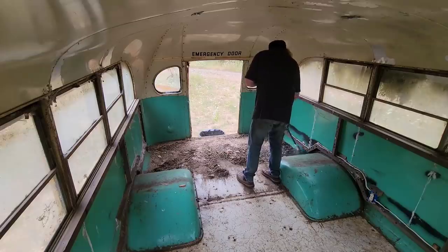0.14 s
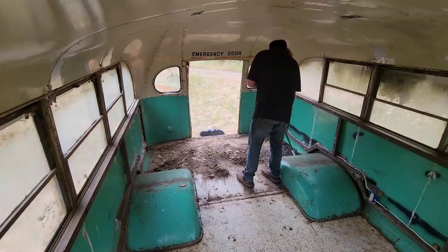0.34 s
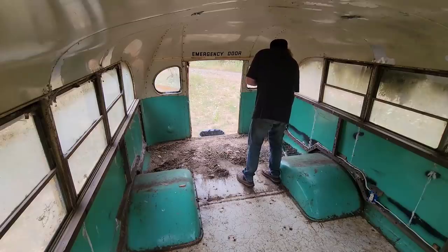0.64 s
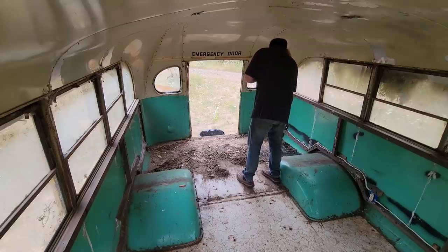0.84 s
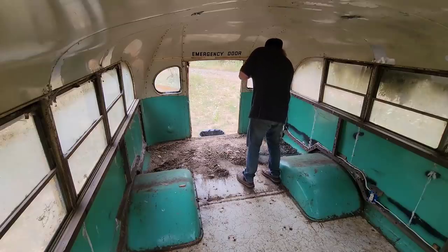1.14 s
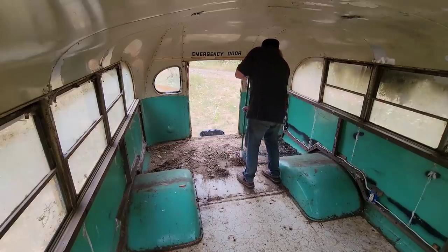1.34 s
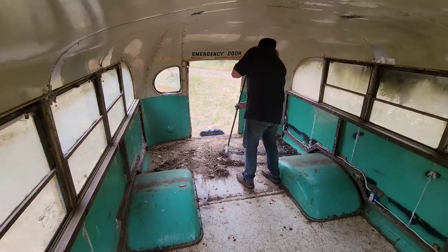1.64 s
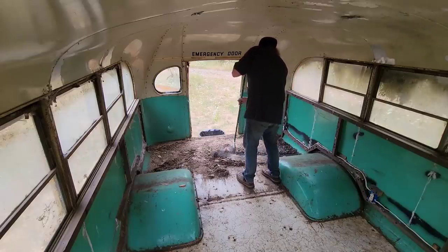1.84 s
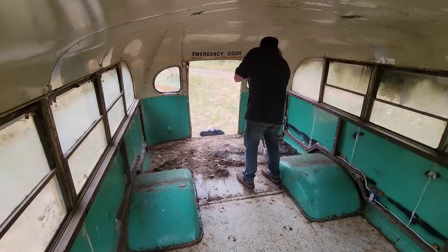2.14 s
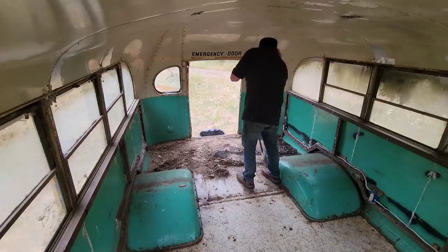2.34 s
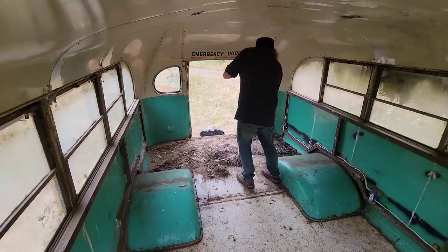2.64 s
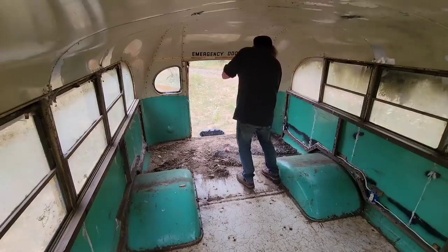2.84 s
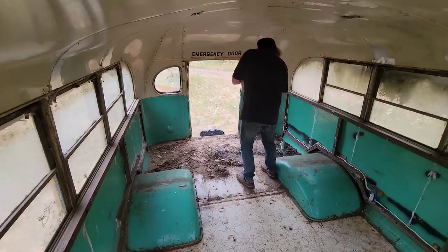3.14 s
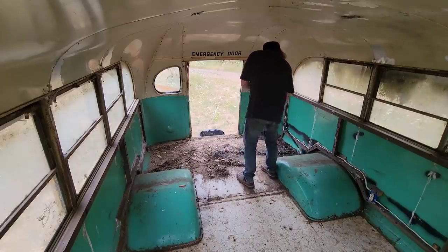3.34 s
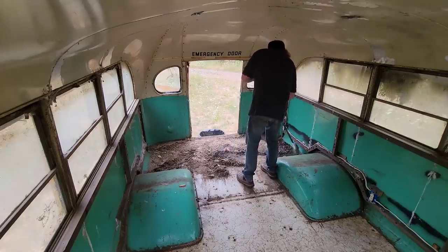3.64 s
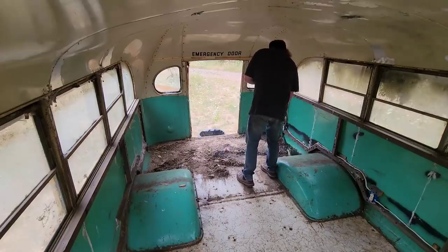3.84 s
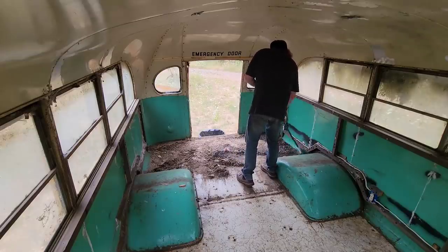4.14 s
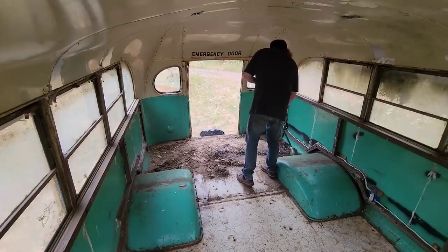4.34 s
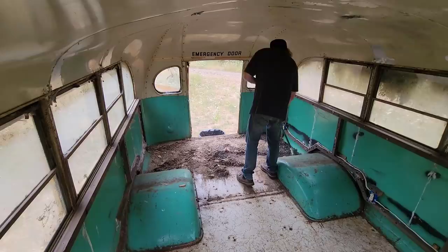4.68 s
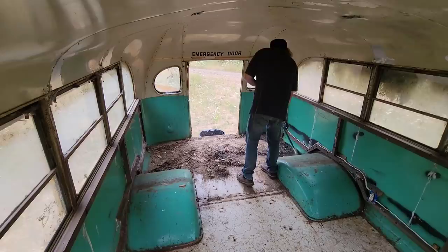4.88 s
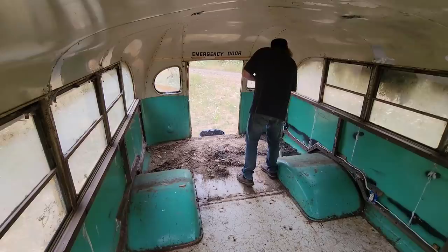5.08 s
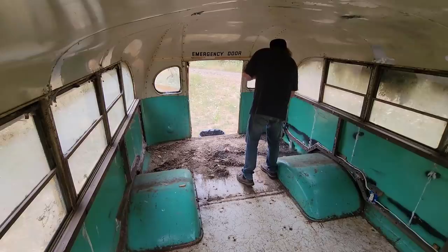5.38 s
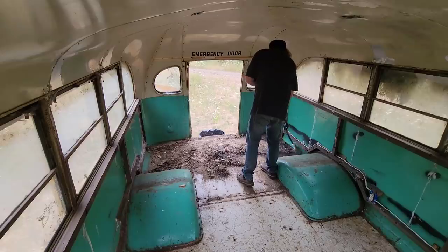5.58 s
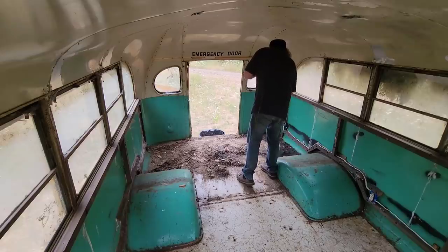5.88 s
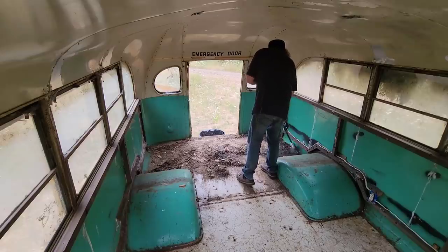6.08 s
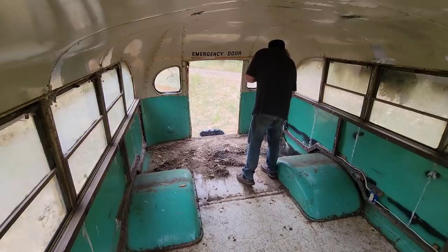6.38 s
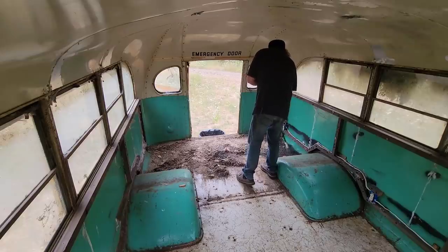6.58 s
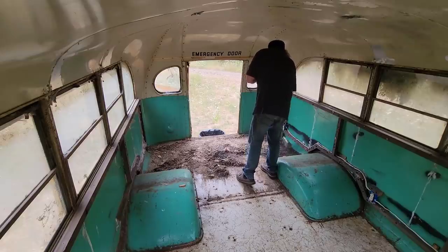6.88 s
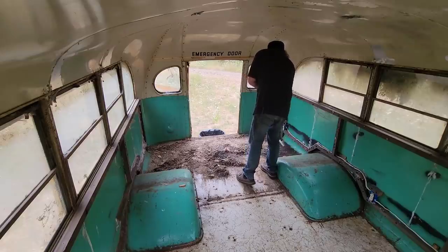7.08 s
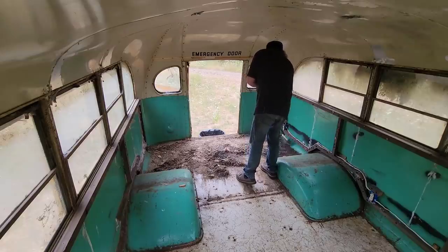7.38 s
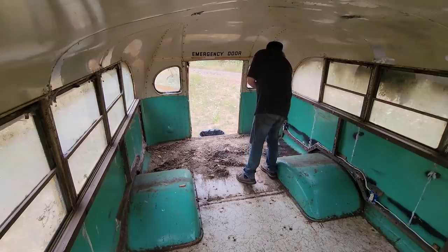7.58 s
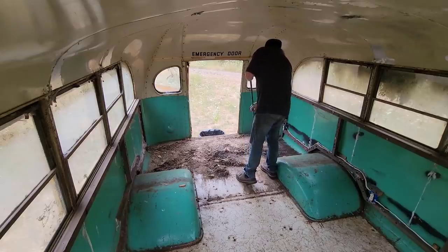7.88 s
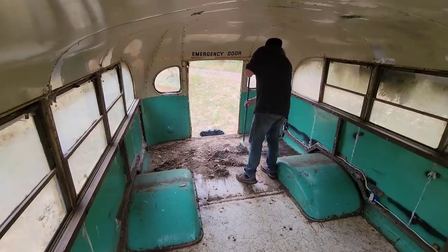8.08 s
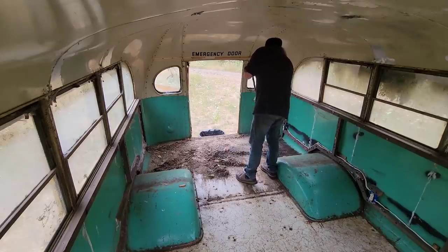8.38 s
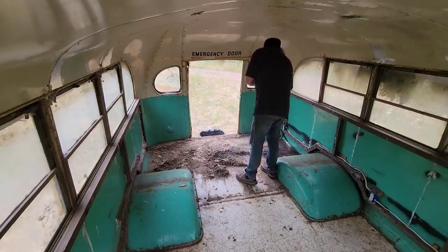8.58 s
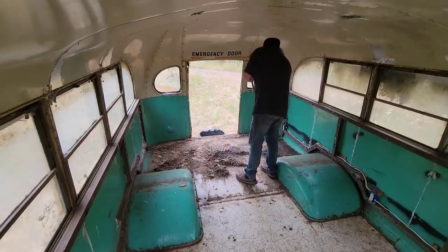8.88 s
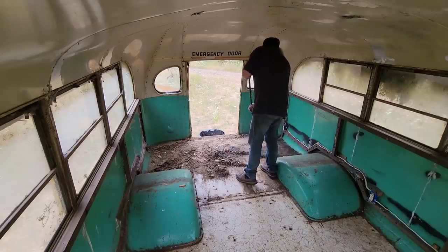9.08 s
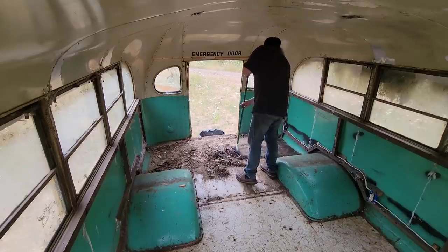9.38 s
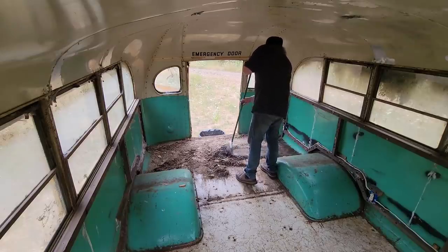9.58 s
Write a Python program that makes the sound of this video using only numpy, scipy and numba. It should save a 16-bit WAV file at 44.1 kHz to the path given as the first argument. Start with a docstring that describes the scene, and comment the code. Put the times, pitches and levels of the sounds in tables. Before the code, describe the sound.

A stiff broom works through dry debris a few metres from the microphones in a bare bus cabin. It begins with two long, gritty sweeps, followed by dull shifting footsteps and small clicks. Short, brisk strokes come next, most starting with a knock on the ringing metal floor. Last come two long scraping pulls, the first with a brief floor panel hum. The space sounds small and hollow, over a faint rumble.

```python
"""Inside an empty bus shell: a stiff broom on dry litter, a few metres from a spaced pair of microphones.
It opens with two long sweeps, bristle tips hissing and grit scraping over the ringing sheet-metal floor.
Near 3 s feet thump and loose bits click. Short strokes follow: the head knocks, the sheet rings, the
shell booms. From 7.4 s come two long, rasping pulls, the first with a floor panel humming under it.
Throughout, the bare cabin scatters the sound between the microphones."""
import sys
import numpy as np
from scipy import signal
from scipy.fft import rfft, irfft
from scipy.io import wavfile
from scipy.ndimage import uniform_filter1d
from numba import njit

SR = 44100
rng = np.random.default_rng(int(sys.argv[2]) if len(sys.argv) > 2 else 0)


def to_wav(sig):
    """Store sig (one row per channel, or 1-D mono) as 16-bit WAV at the path in sys.argv[1].

    Samples outside -1..1 are clipped; the rate is SR.
    """
    pcm = np.clip(np.atleast_2d(sig), -1, 1) * 32767
    pcm = np.round(pcm).astype(np.int16)
    wavfile.write(sys.argv[1], SR, pcm.T)  # frames by channels


N = 428652
TIME, HZ = np.arange(N) / SR, np.fft.rfftfreq(N, 1 / SR)
CONTROL_TIME = TIME[::32]  # coarse grid for level curves

# room tone of the cabin: (frequency [Hz], density [dB])
ROOM_TONE = [(30, -6.5), (85, -0.5), (150, -9), (350, -15.5), (600, -17), (1500, -28), (4000, -25),
             (7000, -28), (15500, -41)]
# likeness of the two spaced microphones: (frequency [Hz], correlation [-1..1])
MIC_CORRELATION = [(60, 0.93), (130, 0.98), (290, 0.69), (640, -0.49), (1410, -0.48), (3100, -0.047),
                   (6820, 0.034), (15000, -0.08)]
# colour of the microphone ports: (frequency [Hz], left over right [dB])
MIC_BALANCE = [(60, 0.5), (110, 0.5), (200, 0.77), (380, 0.25), (700, 0.32), (1290, -1.9), (2380, 0.51),
               (4400, -1.3), (8120, 1.0), (15000, -1.2)]
# deep, middle and upper boom of the shell, a list each: (frequency [Hz], width [Hz], gain [dB])
SHELL_MODES = [
    [(35.2, 15, -15), (54.7, 15, -7)],
    [(88.6, 6.1, 18), (103, 4.7, -19)],
    [(153.5, 3.6, -2.5), (180.4, 58, -7.5)],
]
# shifting feet: (crest [s], rise [s], fall [s], lower ring [dB], three booms [dB])
FOOT_SHIFTS = [(0.09, .05, 0.23, -58, -58, -46, -70), (0.46, 0.09, 0.058, -60, -42, -51, -49),
               (1.298, 0.65, 0.68, -60, -71, -48, -49.5), (2.979, 0.024, 0.13, -60, -49, -41, -47),
               (3.07, 0.1, 0.11, -45.5, -42, -29.5, -54), (3.2, 0.045, 0.38, -58, -51.5, -52, -76),
               (3.54, 0.13, 0.055, -60, -47, -52, -71), (5.81, 0.42, 0.29, -65, -64, -51, -52),
               (9.42, 0.47, 0.29, -46.5, -74, -57, -51.5)]
# heel or broom head on the floor: (time [s], level [dB], pitch [Hz], t60 [s])
THUMPS = [(0.301, -28, 143, 0.36), (2.965, -28, 149, 0.14), (3.01, -25.5, 92, 0.1), (3.06, -38, 68, 0.19),
          (3.088, -20, 85, 0.055), (3.189, -31, 87, 0.38), (3.361, -23, 58, 0.25), (3.809, -40, 56.5, 0.18),
          (4.189, -32, 62.4, 0.37), (5.538, -25, 140.8, 0.49), (5.601, -15, 91.5, 0.096),
          (7.023, -35.5, 153, 0.5), (7.443, -29, 153, 0.26)]
# humming floor panel: (time [s], pitch [Hz], level [dB])
PANEL_HUM = [(7.64, 146.7, -68), (7.68, 148, -43), (7.79, 151, -46), (7.83, 154, -40), (7.88, 153, -46),
             (7.99, 154, -51), (8.03, 152, -75)]
# loose bits of litter: (time [s], level [dB], pitch [Hz], t60 [s], crack over rattle [dB])
LITTER_BITS = [(2.7674, -38.5, 2320, 0.068, -11), (2.9348, -50.5, 4100, 0.14, -12),
               (3.057, -50, 2920, 0.22, -14), (3.114, -48, 8000, 0.033, -6), (3.2544, -50, 9000, 0.025, -6),
               (3.681, -44, 3180, 0.049, -11), (6.472, -40.5, 2600, 0.045, -16),
               (6.8492, -41.5, 4060, 0.091, -12), (8.2463, -29.5, 3770, 0.019, -10),
               (8.254, -36, 4000, 0.031, -12), (8.288, -32.5, 3880, 0.023, -12),
               (8.4514, -42.5, 2360, 0.11, -13), (8.495, -53, 8300, .02, -12),
               (8.581, -44, 4500, 0.022, -12)]

# floor sheet under the bristles, and its upper modes under grit: (frequency [Hz], width [Hz], gain [dB])
SHEET_MODES = [(269, 3.9, 2), (346, 35, 3.5), (410, 38, -4), (526, 120, -4.5), (602, 51, -9), (704, 100, 1),
               (776, 40, -4), (960, 60, -9), (1325, 47, -3.5), (1470, 85, -5)]
GRIT_MODES = [(1185, 35, -4.5), (1487, 74, -1), (1737, 60, 1), (1880, 45, -2), (2553, 76, -2.5),
              (2697, 65, -1), (3014, 60, -4.5)]
# the note of the patch of floor under each stroke: (start [s], pitch [Hz], strength [dB])
FLOOR_PATCHES = [(0, 730, -16), (.25, 898, -5), (.55, 380, -18), (.76, 264, -4), (.89, 335, 2),
                 (.99, 413, 0.5), (1.12, 300, -22), (2.2, 318, -4.5), (3.3, 630, -11), (3.772, 517, -4),
                 (4.119, 800, 0), (4.49, 467, -2), (4.85, 300, 4.5), (5.5, 347, -9), (6.11, 380, 2),
                 (6.52, 460, -25), (7.0, 804, -10), (7.42, 360, -7), (7.52, 204, 5), (7.88, 415, -14),
                 (8.62, 292, -6.5)]
# spectra of the sheet's lower and upper ring, the grit and the tips: (frequency [Hz], density [dB])
LOWER_RING_SPECTRUM = [(150, -8), (240, 4), (400, 1.5), (600, -3.5)]
UPPER_RING_SPECTRUM = [(330, -32), (500, 1.5), (900, 8), (1300, 2.5), (2500, -7)]
GRIT_SPECTRUM = [(600, -18), (1200, 2.5), (2000, 0), (3000, -1.5), (4200, -9.5), (7000, -18.5)]
HISS_SPECTRUM = [(2500, -3), (4500, -2.5), (5700, -4.5), (7000, -4.5), (10000, -6), (12500, -4.5),
                 (15500, -8)]
# rasp of the long pulls, climbing with speed: (time [s], pitch [Hz], level over grit [dB])
GRIT_RASP = [(0, 1480, -7.5), (7.45, 1200, -18), (7.55, 1230, 3), (7.7, 2140, 2), (7.8, 2700, -6.5),
             (7.92, 2715, 4.5), (8.1, 2500, -35), (8.65, 1970, -18), (8.84, 2130, -13), (8.95, 2250, 5),
             (9.1, 2700, 4.5), (9.3, 2400, -24)]
# the top of the hiss against the rest: (time [s], gain [dB])
HISS_TREBLE = [(0, 3.2), (.3, 4.1), (.6, 0.2), (1.1, 0), (1.6, 0.1), (2.1, -3), (2.5, -1), (2.8, -6),
               (3.0, 5), (3.2, -4), (3.35, 3.2), (3.55, -2), (3.8, 4), (4.0, -2), (4.15, 2.3), (4.4, -2.5),
               (4.55, 3.5), (4.8, 0.1), (5.0, 1), (5.25, -0.5), (5.48, 5), (5.55, 1), (5.63, 3),
               (5.72, -3.5), (5.95, -1), (6.14, 2.5), (6.45, 2), (6.7, 0), (7.03, 2.3), (7.3, -4), (7.5, 1),
               (7.75, -0.5), (8.0, 1), (8.3, -3.5), (8.55, -1), (8.8, -2.2), (9.2, -0.3), (9.72, -2)]
# modes of the sheet when struck: (frequency [Hz], t60 [s], swell [s])
KNOCK_MODES = [(338.2, 0.09, 0.0087), (431.4, 0.091, 0.0055), (490, 0.13, 0.0035), (537, 0.08, 0.0027),
               (599, 0.17, 0.0016), (646, .15, .001), (706, 0.2, 0.0016), (767, 0.24, 0.00079),
               (870, 0.11, 0.0022), (955, 0.081, .002)]
# knocks of the head: (time [s], judder decay [s], first blow over judder [dB], level of each mode [dB])
HEAD_KNOCKS = [(0.277, 0.023, -6, -32, -30.5, -33, -34, -29, -37, -33, -38, -25, -32),
               (3.34, 0.024, -6.5, -28, -37, -42, -45, -25, -20.5, -28, -29, -18, -23),
               (3.362, .02, 1.5, -31, -40, -42, -38, -27, -22, -25, -34, -32, -29),
               (3.788, 0.017, 0, -40, -36, -24, -30, -38, -46, -37, -33, -37, -27),
               (4.148, 0.012, 8, -36, -30, -27, -33, -14.5, -35, -22, -15, -40, -24),
               (4.167, .03, 0.5, -25, -34, -32, -39, -29, -34, -22, -14.5, -42, -28),
               (4.242, 0.014, -5, -47, -45, -47, -51, -42, -37, -34, -30, -45, -45),
               (4.521, 0.043, -4, -43, -30, -31, -21.5, -31, -36, -49, -29.5, -25, -29),
               (4.869, 0.037, -6, -38, -42, -31, -36, -37, -33, -32, -32, -32, -46),
               (5.527, 0.03, -5, -21.5, -35, -24.5, -24, -24, -41, -32, -43, -47, -40),
               (6.131, 0.031, -8, -31, -32.5, -54, -52, -38, -47, -44, -42, -37, -29.5),
               (6.542, 0.0099, 1, -43, -51, -60, -56, -50, -44, -41, -46, -35, -40),
               (7.024, 0.042, -9, -38, -37, -44, -33, -30, -29, -36, -27, -34, -39.5),
               (7.445, 0.032, 1, -29, -38, -38, -36, -22.5, -36, -23, -33, -33, -39),
               (8.639, 0.032, -6, -61, -43, -51, -55, -50, -49, -49, -55, -45, -42)]

# A touch feeds seven layers: hiss, grit, upper ring, lower ring, deep, middle and upper boom.
# the broom lands: (time [s], rise of the tips [s], head behind tips [s], seven layer levels [dB])
LANDINGS = [(0.0, 0.06, 0.00083, -43.5, -37.5, -33, -38, -38, -53, -45),
            (0.268, 0.027, 0.012, -34, -31.5, -25, -35, -32.5, -40, -32),
            (2.23, 0.03, 0.0081, -45.5, -46, -63, -68, -65, -67, -70),
            (3.326, 0.026, 0.017, -31.5, -29.5, -24, -41, -32, -33.5, -37.5),
            (3.783, 0.015, 0.011, -37, -33.5, -29, -42, -39.5, -43, -45.5),
            (4.135, 0.046, 0.013, -34, -31, -26, -38, -40, -39.5, -65),
            (4.511, 0.029, 0.016, -34, -33, -27, -39, -51, -77, -47),
            (4.852, 0.016, 0.02, -42.5, -38, -31, -42.5, -45, -47, -43),
            (5.473, 0.0065, .01, -51, -49, -46, -60, -70, -70, -67),
            (5.513, 0.042, 0.017, -34.5, -32, -27.5, -28, -30, -33, -27),
            (6.123, 0.0072, 0.015, -33, -31.5, -32.5, -41, -47, -47.5, -42.5),
            (6.534, 0.01, 0.015, -46.5, -42, -47, -43.5, -51, -63, -70),
            (7.013, 0.019, 0.015, -32.5, -30.5, -30, -38, -61, -68, -47),
            (7.432, 0.016, 0.017, -30.5, -31.5, -25, -35, -42.5, -50, -46),
            (8.637, .008, 0.0077, -65, -47, -48, -52, -63, -58, -71)]
# shape of a landing, by layer: (lag [s]), (hold [s]), (fall [dB/s]), and from the grit on (rise [s])
LAND_LAG_S = [-0.0015, -0.0088, -0.0082, -0.00051, 0.012, 0.0033, 0.015]
LAND_HOLD_S = [0.012, 0.014, 0.014, 0.0038, 0.02, 0.014, 0.0052]
LAND_FALL_DB_S = [380, 300, 264, 166, 91, 110, 172]
HEAD_RISE_S = [0.02, 0.021, 0.046, 0.065, 0.041, 0.047]
# short drags: (crest [s], rise [s], fall [s], hiss [dB], grit, upper and lower ring over hiss [dB])
DRAGS = [(0.04, .04, 0.24, -55.5, 0, 8, 6), (0.33, 0.054, 0.23, -45, 2, 6, 7.5),
         (3.423, 0.15, 0.25, -41, 3.5, 5.5, 3), (3.82, 0.036, 0.2, -43.5, 5.5, 7, 6),
         (4.22, 0.17, 0.25, -40.5, 3.5, 5, 1), (4.56, 0.086, 0.27, -41, 4, 6, 0.5),
         (4.98, 0.22, 0.37, -44.5, -0.5, 3, -3.5), (5.2, 0.39, 0.11, -49, -7.5, -1.5, -6.5),
         (5.6, 0.19, 0.19, -52.5, 1, 10, -2), (5.7, 0.073, 0.21, -37.5, -4, -4, -7.5),
         (5.739, 0.14, 0.28, -41.5, 3.5, -1.5, -8.5), (6.17, 0.033, 0.28, -42.5, 2.5, 1, -5),
         (6.56, 0.041, 0.63, -51, -1, -16, 3), (6.685, 0.19, 0.2, -42, 4.5, 1.5, -14),
         (7.124, 0.13, 0.19, -39.5, 6, 2.5, -5.5)]
# shape of a drag, by layer: (share of the hiss's fade [ratio]), (crest after the hiss [s])
DRAG_FADE = [0.95, 0.98, 1, 0.85, 0.46, 0.93, 0.63]
DRAG_LAG_S = [0, 0.0031, 0, 0.017, .016, .016, 0.0045]
# the shell under a drag: (deep, middle and upper boom over hiss [dB])
DRAG_BOOM_DB = [-18, -24, -18]
# the tips graze the litter on the way back: (crest [s], fall [s], hiss [dB])
GRAZES = [(0.232, 0.088, -61), (2.2, .04, -81), (3.13, 0.2, -59.5), (3.262, 0.034, -61),
          (3.69, 0.53, -59.5), (4.095, 0.045, -65), (4.805, 0.1, -66), (5.368, 0.32, -63), (6.0, 0.12, -52),
          (6.478, 0.028, -61), (6.94, 0.074, -73), (7.35, 0.84, -61)]
# long sweeps, a list each: (time [s], hiss [dB], grit over hiss [dB], upper ring over hiss [dB])
SWEEPS = [
    [(0.53, -63, 5, 3), (0.552, -50.5, 0, -7), (0.59, -42.5, -2.5, -3), (0.72, -44, -1.2, 4.5),
     (0.8, -44, -2.5, 4), (0.92, -43.5, -2.5, 5), (1.03, -44, -1, 3), (1.07, -39, 1, -1.5),
     (1.124, -38.5, -10, -4), (1.36, -44, -3.5, -4.5), (1.552, -45.5, -10, -8), (1.66, -60.5, -1, -1),
     (1.888, -55, -17, -20), (2.012, -68.5, -7, -1.5), (2.2, -92, 7, -10)],
    [(2.22, -75, 1.5, -13), (2.26, -48.5, 2, -2), (2.31, -52, 2, -3), (2.438, -43, -2, 0),
     (2.536, -43, -8.5, -4.5), (2.794, -56, 0, -4), (2.93, -69, -5, 4.5), (3.0, -82, 8, 15)],
    [(7.44, -56, 1.5, 3), (7.47, -40.5, -3, -3), (7.562, -42, 4.5, -4.5), (7.728, -35, 1.5, -8.5),
     (7.81, -40, -2.5, -5), (7.952, -36.5, -0.5, -8.5), (8.162, -55, -10, -7), (8.26, -47.5, -13, -13.5),
     (8.44, -70.5, -3, 5.5), (8.46, -67, 8.5, -2), (8.6, -84.5, 11, 11)],
    [(8.636, -56.5, 21.5, 9), (8.652, -51, -1, -2.5), (8.804, -37.5, 4, -4.5), (8.86, -43, 9.5, 0.5),
     (8.95, -41, -6.5, -0.5), (9.03, -43, 1.5, -1), (9.098, -40, -1.5, -2.5), (9.164, -44, -5.5, 1),
     (9.416, -46.5, -7, -13), (9.522, -58, -4.5, -5), (9.62, -54.5, -14, -16), (9.72, -53, -12, -14)],
]
# low end of each sweep: (lower over upper ring [dB], three booms over hiss [dB])
SWEEP_BODY = [(1.5, -26, -12, -11.5), (2.5, -25, -11, -13.5), (-1, -31, -19.5, -15), (-2, -31, -22.5, -21)]

GRAZE_RISE_S, GRAZE_COLOUR_DB = 0.076, [-2, -3.5, -7]  # grit, upper and lower ring over hiss
BITE_DB_PER_DECADE = 36.5  # the tips bite fast, then press on
SETTLE_DB, SETTLE_S = -36, 0.49  # litter trickles on after a drag: level against the hiss, fall time
CABIN_T60_S, CRACK_T60_S = 0.19, 0.0099
RASP_WIDTH_HZ, TREBLE_FROM_HZ = 2600, 6300
BASS_CUT_HZ, TOP_CUT_HZ = 16, 15550
ROOM_TONE_DB, SILENT_DB = -65, -200


def undb(db):
    """Decibels to amplitude."""
    return 10 ** (np.asarray(db) / 20)


def unit(x):
    """Scale to an RMS of 1."""
    return x / np.sqrt(np.mean(x ** 2))


def decay(t, t60):
    """A fade of 60 dB every t60 seconds."""
    return np.exp(-np.log(1000) * t / t60)


def along_hz(table):
    """A (frequency, value) table read at every frequency."""
    hz, value = np.transpose(table)
    return np.interp(np.log(HZ + 1), np.log(hz), value)


def along_time(table):
    """Each column of a (time, ...) table read at every sample."""
    times, *columns = np.transpose(table)
    return [np.interp(TIME, times, column) for column in columns]


def colour(x, table):
    """Shape the spectrum; beyond the table's ends it keeps falling."""
    skirts = np.minimum(1, HZ / table[0][0]) ** 2 * np.minimum(1, table[-1][0] / (HZ + 1)) ** 2
    return irfft(rfft(x) * undb(along_hz(table)) * skirts, N)


@njit
def bandpass(x, hz, width):
    """State-variable band-pass with a moving centre, gain 1 there."""
    out, band_state, low_state = np.empty(len(x)), 0., 0.
    for i in range(len(x)):
        g, damping = np.tan(np.pi * hz[i] / SR), width / hz[i]
        band = (band_state + g * (x[i] - low_state)) / (1 + g * (g + damping))
        band_state, low_state = 2 * band - band_state, low_state + 2 * g * band
        out[i] = damping * band
    return out


def bandpass_twice(x, hz, width):
    """Two band-passes in a row, for steeper skirts."""
    return bandpass(bandpass(x, hz, width), hz, width)


def ring(x, modes):
    """Sum of steady resonances driven by x."""
    return sum(undb(db) * bandpass(x, np.full(N, float(hz)), float(width)) for hz, width, db in modes)


def slips(rate_hz, spread_db):
    """Tiny stick-slip releases at random moments, a few much stronger than the rest."""
    hit = rng.random(N) < rate_hz / SR
    return hit * rng.standard_normal(N) * undb(spread_db * rng.exponential(size=N))


def flicker(rate_hz, depth_db):
    """Gain that wanders as the bristles cross uneven litter."""
    hold = int(SR / rate_hz)
    steps = np.repeat(rng.standard_normal(N // hold + 1), hold)[:N]
    return undb(depth_db * uniform_filter1d(uniform_filter1d(steps, hold), hold))


def swell_db(crest, rise, fall, fade=(1,), lag=(0,)):
    """Climb 30 dB over `rise` to 0 dB, then drop 30 dB times `fade` over `fall`; one row a layer."""
    t = CONTROL_TIME - crest - np.vstack(lag)
    from_crest = np.where(t < 0, -t / rise, t / fall)
    return -30 * from_crest ** 1.316 * np.where(t < 0, 1, np.vstack(fade))


def room_tone():
    """The faint, steady rumble and air of the empty cabin."""
    return undb(ROOM_TONE_DB) * unit(colour(rng.standard_normal(N), ROOM_TONE))


def cabin(x, hop):
    """Dense reflections off the bare walls; every `hop` samples the sound takes other paths."""
    tail = decay(TIME[:SR // 5], CABIN_T60_S)
    window = np.sqrt(np.hanning(2 * hop + 1)[:-1])
    x, out = np.pad(x, (hop, 2 * hop)), np.zeros(N + SR)
    for i in range(0, N + hop, hop):
        echoes = signal.fftconvolve(x[i:i + 2 * hop] * window, rng.standard_normal(len(tail)) * tail)
        out[i:i + len(echoes)] += echoes
    return out[hop:hop + N] / np.sqrt(np.sum(tail ** 2))


def shell_boom(booms_db):
    """The low modes of floor and walls all around the microphones, shaken and left to ring."""
    out = 0
    for db, modes in zip(booms_db, SHELL_MODES):
        push = rng.standard_normal(N)
        steady_rms = np.sqrt(np.mean(ring(push, modes) ** 2))
        out += ring(push * undb(db), modes) / steady_rms
    return out


def foot_shifts():
    """Layer levels in dB as shifting feet shake only the floor and shell."""
    for crest, rise, fall, *levels_db in FOOT_SHIFTS:
        yield np.vstack([SILENT_DB] * 3 + levels_db) + swell_db(crest, rise, fall)


def thumps():
    """A heel or the broom head meets the floor softly: one low note, swelling over milliseconds."""
    out, t = np.zeros(N + SR), TIME[:SR // 2]
    attack = 1 - np.exp(-t / 0.0037)
    for start, db, hz, t60 in THUMPS:
        i = int(start * SR)
        out[i:i + len(t)] += undb(db) * np.sin(2 * np.pi * hz * t) * attack * decay(t, t60)
    return out[:N]


def panel_hum():
    """A floor panel holds a wavering note under one long pull."""
    hz, db = along_time(PANEL_HUM)
    sounding = (TIME > PANEL_HUM[0][0]) & (TIME < PANEL_HUM[-1][0])
    tone = np.sqrt(2) * np.sin(2 * np.pi * np.cumsum(hz) / SR)
    return sounding * undb(db) * flicker(rate_hz=22, depth_db=1.2) * tone


def litter_clicks():
    """Single bits click or skitter: a short rattle around one pitch with a wide crack on top."""
    out, t = np.zeros(N), TIME[:SR // 4]
    attack = 1 - np.exp(-t / 0.0018)
    for start, db, hz, t60, crack_db in LITTER_BITS:
        noise = rng.standard_normal(len(t))
        rattle = unit(bandpass_twice(noise, np.full(len(t), hz), width=0.64 * hz))
        crack = undb(crack_db) * np.diff(noise, prepend=0) * decay(t, CRACK_T60_S)
        i = int(start * SR)
        out[i:i + len(t)] += undb(db) * (rattle + crack) * attack * decay(t, t60)
    return out


def floor_ring(grit_db, upper_db, lower_db):
    """Slips drive the sheet's modes and the note of the patch under the broom; grit rings higher modes."""
    push = unit(slips(rate_hz=6000, spread_db=0.69))
    starts, patch_hz, patch_db = np.transpose(FLOOR_PATCHES)
    patch = np.searchsorted(starts, TIME, side="right").clip(1) - 1
    patch_note = undb(9.5 + patch_db[patch]) * bandpass(push, patch_hz[patch], width=31.0)
    sheet = push + undb(2) * ring(push, SHEET_MODES) + patch_note
    upper = undb(upper_db) * unit(colour(sheet, UPPER_RING_SPECTRUM))
    lower = undb(lower_db) * unit(colour(sheet, LOWER_RING_SPECTRUM))
    return upper + lower + undb(grit_db - 7.5) * unit(ring(push, GRIT_MODES))


def head_knocks(phase):
    """The head strikes, judders for a moment, and each mode of the sheet swells and rings out."""
    out, t = np.zeros(N + SR), TIME[:SR // 2]
    for start, judder_s, blow_db, *modes_db in HEAD_KNOCKS:
        i, judder = int(start * SR), np.exp(-t / judder_s)
        for (hz, t60, swell_s), db in zip(KNOCK_MODES, modes_db):
            attack = (1 - np.exp(-t / swell_s)) ** 2
            mode = np.sin(2 * np.pi * hz * t + phase) * attack * decay(t, t60)
            push = judder * rng.standard_normal(len(t))
            push[0] = undb(blow_db) * np.sqrt(np.sum(judder ** 2))  # the first blow
            rung = signal.fftconvolve(push, mode)[:len(t)]
            out[i:i + len(t)] += undb(db) * rung / np.abs(rung).max()
    return out[:N]


def grit_scrape():
    """Grit sticks and slips on the metal, rasping around a climbing pitch on the long pulls."""
    grit = unit(colour(slips(rate_hz=8000, spread_db=1.25), GRIT_SPECTRUM))
    grit *= flicker(rate_hz=25, depth_db=0.24)
    rasp_hz, rasp_db = along_time(GRIT_RASP)
    rasp = bandpass_twice(slips(rate_hz=14000, spread_db=0.8), rasp_hz, RASP_WIDTH_HZ)
    return grit + undb(rasp_db) * unit(rasp)


def bristle_hiss():
    """The slips of many tips merge into a hiss whose treble rises and falls."""
    hiss = unit(colour(slips(rate_hz=22000, spread_db=0.39), HISS_SPECTRUM))
    hiss *= flicker(rate_hz=33, depth_db=0.4)
    treble = irfft(rfft(hiss) / (1 + (TREBLE_FROM_HZ / (HZ + 1)) ** 8), N)
    treble_gain = undb(along_time(HISS_TREBLE)[0])
    return hiss + (treble_gain - 1) * treble


def broom_landings():
    """Layer levels in dB as the tips land, then the head; heavier parts swell later and last longer."""
    for time, tip_rise, head_delay, *levels_db in LANDINGS:
        t = CONTROL_TIME - time - np.vstack(LAND_LAG_S) - np.vstack([0] + [head_delay] * 6)
        rise = np.vstack([tip_rise, *HEAD_RISE_S])
        bite_db = BITE_DB_PER_DECADE * np.log10(np.maximum(1 + t / rise, 1e-6))
        release_db = -np.vstack(LAND_FALL_DB_S) * (t - np.vstack(LAND_HOLD_S))
        yield np.vstack(levels_db) + np.minimum(0, np.minimum(bite_db, release_db))


def broom_drags():
    """Layer levels in dB for short drags, grazes on the way back, and litter settling after a drag."""
    grazes = [(crest, GRAZE_RISE_S, fall, db, *GRAZE_COLOUR_DB) for crest, fall, db in GRAZES]
    for crest, rise, fall, hiss_db, *colour_db in DRAGS + grazes:
        levels_db = hiss_db + np.vstack([0, *colour_db, *DRAG_BOOM_DB])
        yield levels_db + swell_db(crest, rise, fall, DRAG_FADE, DRAG_LAG_S)
    for crest, rise, _, hiss_db, *_ in DRAGS:
        yield np.vstack([hiss_db + SETTLE_DB] + [SILENT_DB] * 6) + swell_db(crest, rise, SETTLE_S)


def broom_sweeps():
    """Layer levels in dB while the broom stays down; grit, floor and shell follow the hiss."""
    for sweep, (lower_db, *booms_db) in zip(SWEEPS, SWEEP_BODY):
        times, *columns = np.transpose(sweep)
        hiss, grit, upper = (np.interp(CONTROL_TIME, times, column) for column in columns)
        hiss[(CONTROL_TIME < times[0]) | (CONTROL_TIME > times[-1])] = SILENT_DB
        yield np.array([hiss + offset for offset in (0, grit, upper, upper + lower_db, *booms_db)])


def contact_levels():
    """Level in dB of the seven layers at every sample: all touches add in power."""
    touches = [*foot_shifts(), *broom_landings(), *broom_drags(), *broom_sweeps()]
    power = sum(undb(touch) ** 2 for touch in touches)
    return [np.interp(TIME, CONTROL_TIME, layer) for layer in 10 * np.log10(power + 1e-12)]


def spaced_pair(mid, side):
    """Left and right, with mid and side weighted by how alike the microphones hear each frequency."""
    correlation = along_hz(MIC_CORRELATION)
    mid = irfft(rfft(mid) * np.sqrt((1 + correlation) / 2), N)
    side = irfft(rfft(side) * np.sqrt((1 - correlation) / 2), N)
    return np.array([mid + side, mid - side])


def scene():
    """The broom from a few metres off: two diffuse fields, plus direct clicks, knocks, thumps and hum."""
    hiss_db, grit_db, upper_db, lower_db, *booms_db = contact_levels()
    scrape = undb(hiss_db) * bristle_hiss() + undb(grit_db) * grit_scrape()
    floor = floor_ring(grit_db, upper_db, lower_db)
    clicks, thuds = litter_clicks(), thumps()
    # the many tips each have their own paths; the sheet keeps its paths longer
    mid, side = (undb(3.5) * cabin(scrape + undb(-7) * clicks, hop=350)
                 + undb(1) * cabin(floor, hop=1700)
                 + shell_boom(booms_db) + room_tone() for _ in range(2))
    mid += clicks + head_knocks(phase=0) + thuds + panel_hum()
    side += clicks + undb(-4.5) * head_knocks(phase=np.pi / 2) + undb(-10) * thuds
    return spaced_pair(mid, side)


def record(dry):
    """Each microphone port colours its side a little; the camera cuts the deepest bass and the top."""
    balance = undb(np.outer([.5, -.5], along_hz(MIC_BALANCE)))
    ports = irfft(rfft(dry) * balance, N)
    bass_cut = signal.butter(2, BASS_CUT_HZ, "high", fs=SR, output="sos")
    top_cut = signal.ellip(10, .2, 80, TOP_CUT_HZ, fs=SR, output="sos")
    return signal.sosfilt(top_cut, signal.sosfilt(bass_cut, ports))


dry = scene()
out = record(dry)
to_wav(out)
```